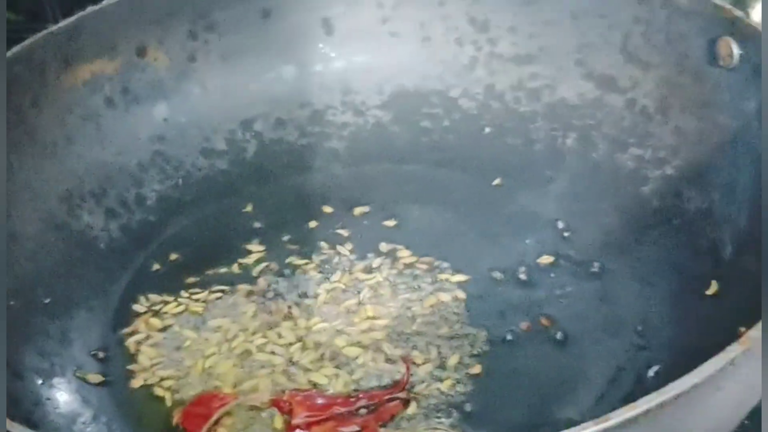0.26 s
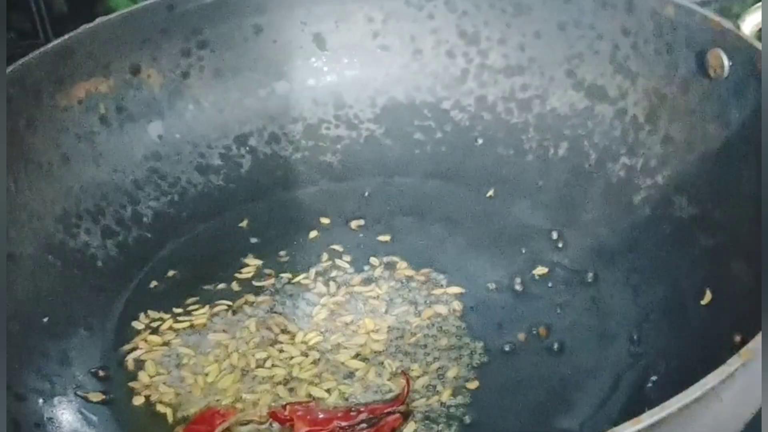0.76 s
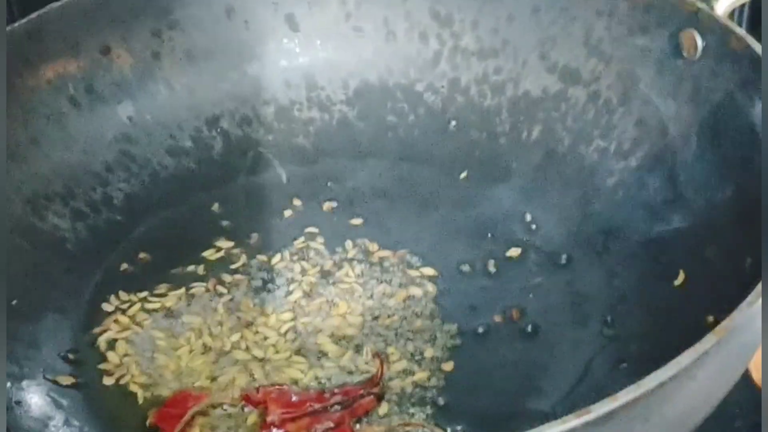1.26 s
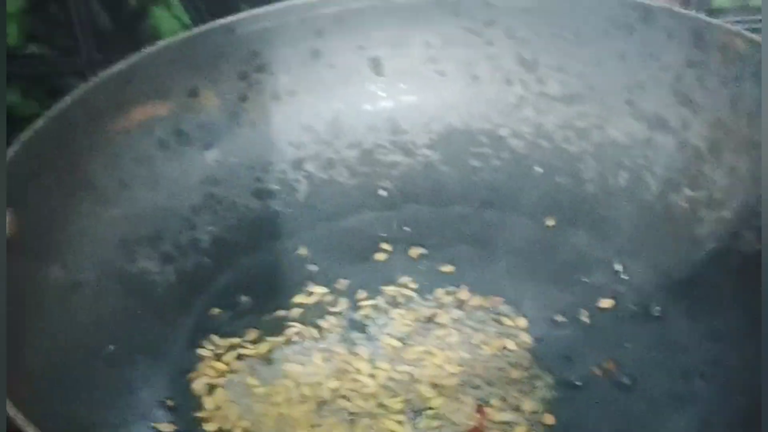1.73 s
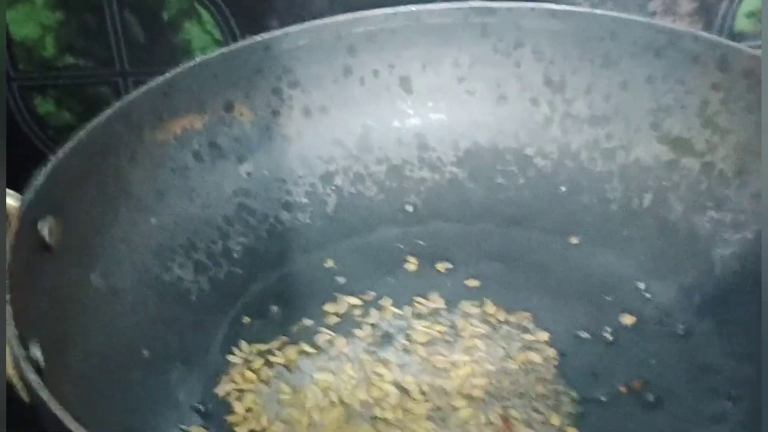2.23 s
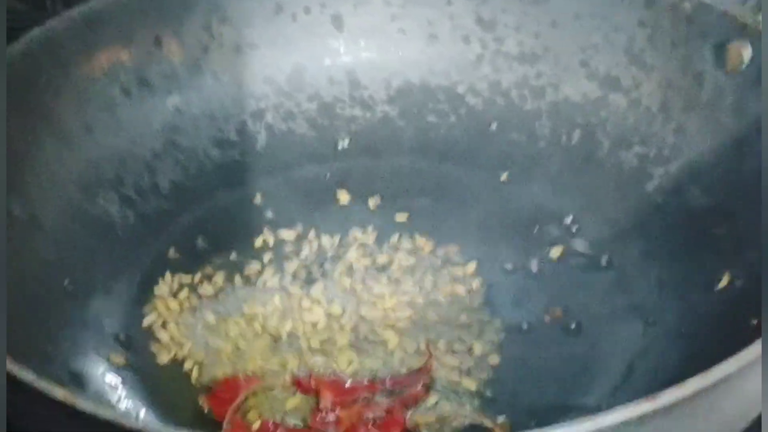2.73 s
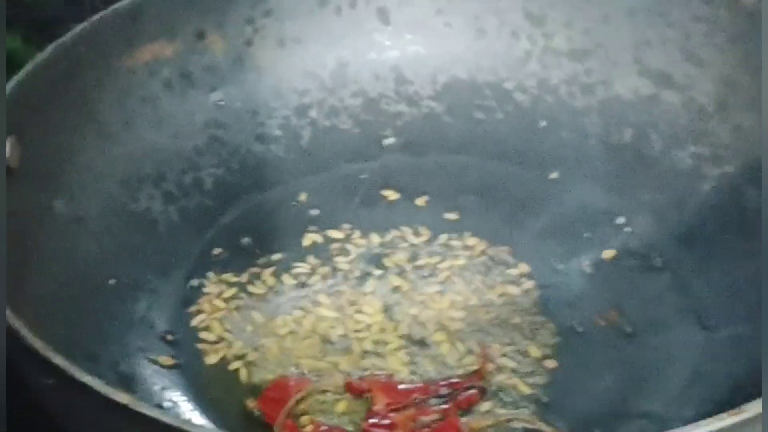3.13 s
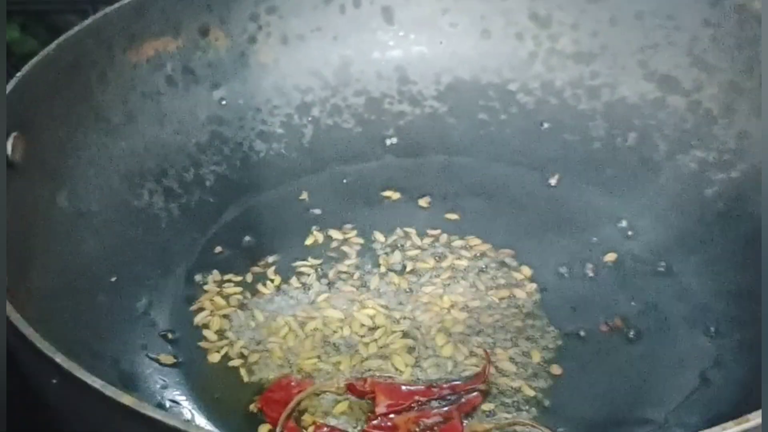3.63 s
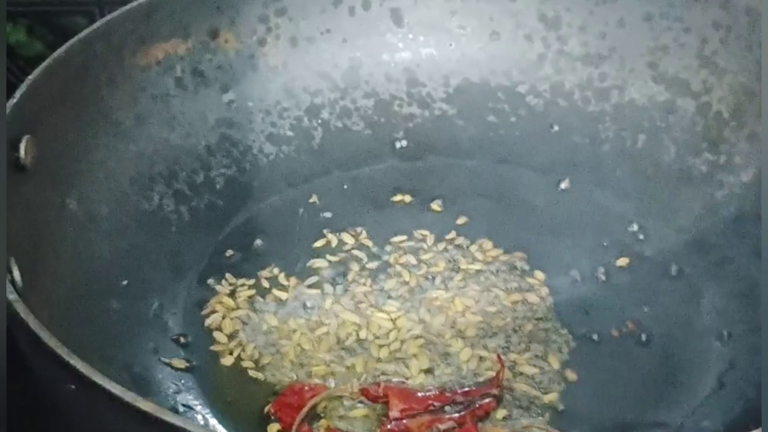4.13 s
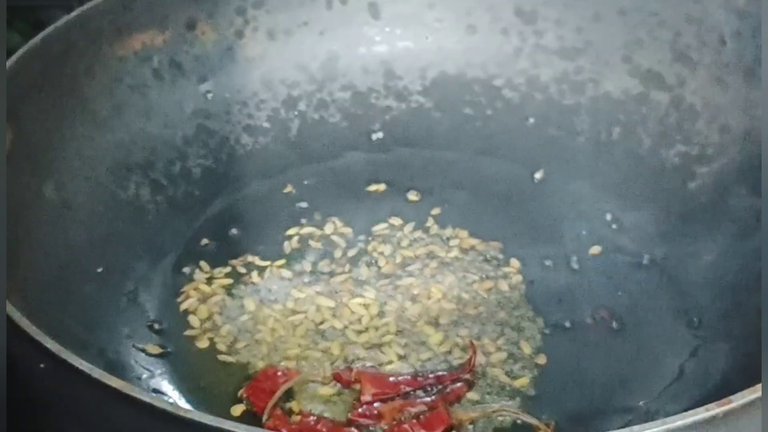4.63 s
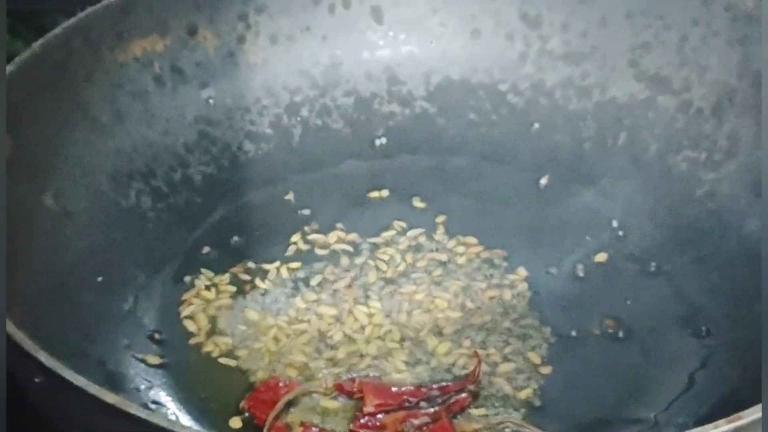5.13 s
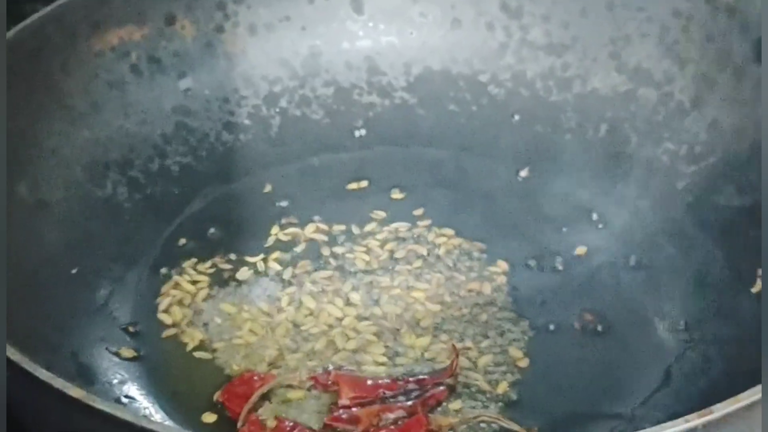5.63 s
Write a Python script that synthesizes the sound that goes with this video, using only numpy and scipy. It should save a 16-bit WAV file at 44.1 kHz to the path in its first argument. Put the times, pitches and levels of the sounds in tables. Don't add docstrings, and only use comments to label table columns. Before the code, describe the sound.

Spice seeds burst in hot oil in an iron pan, close to a hand-held stereo microphone. Irregular bright snaps, duller pops under the oil and tiny ticks each rattle quickly off the metal and die in a small hard kitchen. Behind them are fizzing oil, a low gas flame and a soft fan hum.

```python
import sys
import numpy as np
from scipy import signal
from scipy.fft import rfft, irfft, next_fast_len
from scipy.io import wavfile

SR = 44100
rng = np.random.default_rng(int(sys.argv[2]) if len(sys.argv) > 2 else 0)


def amp(db):
    return 10 ** (np.asarray(db, float) / 20)


def write(x):
    x = np.atleast_2d(x).T
    wavfile.write(sys.argv[1], SR, np.round(np.clip(x, -1, 1) * 32767).astype(np.int16))


N = 259749

# (multiple of shaft rate, level [dB rms])
MOTOR_ORDERS = [(4, -71.5), (8, -72.5), (10, -56), (13, -61), (16, -65.5), (24, -71.5)]
# (frequency [Hz], density [dB per Hz])
FLAME_SPECTRUM = [(20, -50.5), (40, -19.5), (66, -17.5), (85, -11), (110, -21), (150, -11.5), (172, -8.5),
                  (200, 0), (260, -5), (330, -5), (370, -14.5), (440, -14), (520, -18.5), (700, -23.5),
                  (900, -34), (1300, -88.5)]
# (frequency [Hz], density [dB per Hz])
FIZZ_SPECTRUM = [(500, -1), (900, -1.5), (1500, 3), (2200, 1), (4000, -1), (6500, 2), (9000, 5),
                 (12000, 4.5), (14000, -1.5), (16000, 2)]
# (time [s], level [dB])
SEETHING = [(0.0, -52.5), (0.31, -49.5), (0.51, -58), (1.03, -52.5), (1.212, -51), (1.67, -58), (1.9, -51),
            (2.29, -62), (2.56, -53), (2.85, -55), (3.251, -50.5), (3.53, -62), (3.85, -63), (4.05, -56.5),
            (4.64, -55), (4.9, -61), (5.41, -57.5), (5.89, -55.5)]
# (frequency [Hz], left-right likeness)
LIKENESS = [(60, 0.53), (150, 1), (380, 0.93), (950, 0.035), (2380, -0.02), (5980, -0.17), (15000, 0.89)]

# (time [s], peak [dB])
GUSTS = [
    (1.977, -43),
    (2.596, -45),
    (3.108, -39),
]
# (time [s], level [dB])
BOWL_HISS = [(.169, -44), (.451, -48), (.697, -51), (1.04, -43.5), (1.173, -43), (1.364, -51), (1.459, -48),
             (2.357, -43), (2.409, -44), (2.543, -42), (3.042, -47), (3.08, -34), (3.109, -36),
             (3.351, -36.5), (3.433, -36.5), (3.678, -53.5), (4.059, -38.5), (4.287, -51), (4.329, -55),
             (5.053, -47), (5.167, -49), (5.255, -42.5), (5.32, -36)]
# (time [s], level [dB])
SPRAY = [(.697, -42), (.781, -48), (1.173, -40.5), (1.364, -43), (1.385, -48), (1.668, -59), (3.08, -50),
         (3.109, -39.5), (4.07, -40.5), (4.366, -44.5), (5.053, -52), (5.167, -53), (5.203, -55),
         (5.32, -46), (5.486, -51), (5.688, -52), (2.543, -48), (4.581, -44), (3.902, -44), (.245, -42)]
# (time [s], level [dB])
MIST = [(.245, -48), (.414, -52), (.697, -56), (1.767, -52), (1.777, -50), (1.846, -52), (1.978, -48),
        (2.237, -53), (2.471, -47), (2.597, -48), (3.109, -50), (3.902, -64), (3.942, -41), (4.005, -47),
        (4.476, -48), (4.581, -38), (5.202, -58), (5.287, -40), (5.32, -44), (5.415, -46), (5.603, -54),
        (5.814, -50)]
# (time [s], peak [dB], note [Hz], left-right difference [dB])
BLISTERS = [(0.169, -27, 2900, 0), (1.768, -25, 2900, -2), (1.877, -29.5, 2800, -4), (1.98, -28, 2900, 0),
            (1.979, -29, 1600, 5), (2.41, -32, 2960, 0), (2.544, -26, 3200, 0), (3.903, -32, 2850, 0),
            (3.942, -31, 1480, 2), (4.154, -39, 3000, 0), (5.288, -28, 2850, 0), (5.416, -36, 3070, 0),
            (.698, -47, 2930, 0), (5.815, -36, 2900, 0), (5.487, -43, 3100, 0), (.27, -30, 2800, 0),
            (1.666, -36, 1800, 0), (3.08, -30, 1960, 0), (5.208, -40, 6000, 0), (3.942, -40, 1245, 0),
            (1.175, -44, 1200, 0), (5.322, -43, 1250, 0), (1.9, -43, 3550, 0), (1.769, -31, 4170, 0),
            (4.329, -30, 4900, 0), (3.353, -34, 3700, 0), (3.436, -28, 4380, 0), (.452, -29, 5000, 0),
            (2.597, -31, 2200, 0), (5.487, -31, 6800, 0), (5.487, -33, 10600, 4), (2.412, -28, 4300, 0),
            (.248, -21, 6600, -3), (2.357, -34, 4500, 0), (2.551, -28, 2900, 0), (4.005, -28, 11500, 4),
            (1.635, -37, 2850, 0), (3.08, -29, 3500, 0), (4.154, -42, 2300, 0)]

# (time [s], level [dB])
SPARKS = [(0.2444, -26), (.4126, -32), (1.6332, -38), (1.7762, -30), (1.8455, -30), (1.9775, -30),
          (2.091, -36), (2.2364, -38), (2.411, -38), (2.596, -32), (2.8971, -38), (3.9403, -22),
          (4.0045, -25), (4.1162, -40), (4.4745, -30), (4.5802, -26), (4.986, -38), (5.2857, -27),
          (5.4135, -30), (5.813, -34)]
# (time [s], straight level [dB], room level [dB])
CLICKS = [(.2442, -21, -40), (.696, -34, -40), (1.3625, -23, -40), (1.384, -32, -40), (1.4577, -26, -40),
          (1.172, -21, -40), (2.2363, -24, -40), (3.041, -24, -40), (3.078, -22, -34), (4.0573, -22, -40),
          (4.3277, -28, -40), (5.0135, -25, -36), (5.031, -36, -30), (5.4853, -32, -32), (5.7293, -35, -38),
          (5.813, -39, -40), (1.155, -40, -24), (3.4025, -42, -40), (4.082, -29, -36), (5.207, -32, -38),
          (2.5505, -22, -36), (4.341, -36, -36), (1.854, -34, -40), (2.364, -32, -40), (2.481, -34, -40),
          (3.158, -32, -40), (3.18, -32, -40), (3.2, -33, -40), (3.222, -36, -42), (3.234, -37, -42),
          (5.26, -36, -42), (5.3, -26, -38), (5.327, -24, -38), (5.35, -32, -40), (5.378, -34, -40),
          (2.413, -26, -38), (2.606, -32, -40), (1.772, -28, -40)]
# (time [s], peak [dB], cavity [Hz], room share [dB])
PODS = [(0.1695, -15, 2860, -5), (0.4504, -19.5, 4550, 3.5), (0.6958, -17, 4400, 1),
        (1.0395, -40, 3714, -1), (1.1742, -21, 4100, 5), (1.3628, -25.5, 4730, 5), (1.3843, -18.5, 4560, 6),
        (1.4581, -22, 4900, 6), (1.4855, -19.5, 4720, -11), (1.767, -20.5, 3040, 6),
        (1.876, -23, 2970, 3.5), (1.9774, -33, 3100, 4), (2.2368, -16.5, 5440, -1), (2.356, -18.5, 2980, 3),
        (2.4084, -14.5, 2950, -14), (2.4714, -16.5, 3340, -9), (2.5421, -17, 2960, 0),
        (3.041, -23, 4160, 1), (3.0784, -14.5, 3850, 4.5), (3.1078, -6.5, 3100, -13),
        (3.3513, -21.5, 4080, 3), (3.4331, -30, 4090, 0), (3.901, -18, 4580, -2), (4.0584, -34, 3890, 0),
        (4.2867, -28, 4350, 10.5), (4.3281, -26.5, 4670, 9.5), (5.018, -26, 3420, 5),
        (5.1667, -19.5, 4330, 1), (5.2545, -35, 3810, 9), (5.3177, -20.5, 3880, 4)]

# (time [s], peak [dB], thump [dB], knock [dB], crack [dB], snap [dB])
EARLIER_POP = [
    (-.001, -18, -36, -11.5, -12, -7),
]
# (time [s], peak [dB], thump [dB], crack [dB], snap [dB])
CRISP = [(0.2442, -5, -32.5, -12.5, -12.5), (0.2685, -13, -18, -14, -9.5), (0.4125, -14, -22, -15.5, -11),
         (0.4508, -16, -29, -13.5, -18), (1.3631, -17, -24.5, -17, -21), (1.6332, -22, -15.5, -18, -12),
         (1.7762, -20, -23, -24, -3.5), (1.8456, -20.5, -25, -12, -4), (2.0868, -23, -18, -21, -13.5),
         (2.2364, -16, -26.5, -16, -15.5), (2.4704, -13, -29, -18, -20), (2.596, -12.5, -21, -14.5, -15),
         (3.9405, -7, -27.5, -14, -13), (4.004, -19.5, -18, -15, -5), (4.4743, -22, -18, -15, -6.5),
         (4.58, -9.5, -27, -15, -9.5), (5.2007, -25, -19, -10, -10.5), (5.2858, -10, -23, -16.5, -11),
         (5.4138, -14.5, -18, -17.5, -12), (5.4848, -18, -46, -9.5, -13.5), (5.571, -17, -26, -20.5, -19),
         (5.6012, -22.5, -24, -14.5, -7.5), (5.813, -13, -23.5, -14.5, -10)]
# (time [s], peak [dB], thump [dB], knock [dB], top [dB])
MUFFLED = [(0.168, -9.5, -36, -14.5, -28), (.696, -16, -66, -11.5, -18), (0.7796, -14, -34.5, -17.5, -20),
           (1.0387, -19.5, -33.5, -15, -23.5), (1.172, -9.5, -37, -14, -22), (1.4578, -18.5, -27, -15, -22),
           (1.766, -11.5, -30.5, -24, -21.5), (1.9769, -11, -20.5, -13.5, -15),
           (2.3551, -20, -25, -28, -25), (2.4078, -7, -32, -14.5, -23), (2.5422, -5.5, -30, -12.5, -23),
           (3.041, -17.5, -21.5, -17.5, -20), (3.078, -13.5, -34, -8, -24), (3.1077, -7.5, -25, -14, -22),
           (3.351, -16.5, -30, -10, -24.5), (3.433, -10.5, -32.5, -20, -26.5),
           (3.901, -17, -24.5, -12.5, -19), (4.058, -13.5, -28, -12.5, -22), (4.069, -17, -23.5, -15, -17),
           (4.2859, -17.5, -27, -18.5, -23.5), (4.924, -22, -26, -21.5, -31),
           (5.017, -19.5, -24.5, -17, -30), (5.0517, -16, -30.5, -10.5, -22.5),
           (5.1655, -18, -40, -23, -25), (5.319, -4, -29.5, -12, -23.5)]
# (time [s], peak [dB], knock [dB], snap [dB])
TICKS = [(0.765, -23.5, -13, -14.5), (.902, -33, -13, -9.5), (1.134, -27.5, -14, -9.5),
         (1.3423, -31, -20, -6), (1.3834, -30, -9, -9.5), (1.485, -20, -25, -22.5), (1.665, -26, -11, -17),
         (1.8055, -21, -16, -21), (1.875, -37, -21.5, -19.5), (1.942, -35, -18.5, -9.5),
         (2.0317, -24, -15, -11.5), (2.314, -26.5, -10, -19), (2.8971, -30, -10.5, -7),
         (3.59, -44, -25.5, -3), (3.677, -32.5, -12, -36), (4.127, -30.5, -14, -7), (4.152, -29, -3.5, -17),
         (4.3283, -23.5, -35, -17), (4.365, -30.5, -15, -20.5), (4.4342, -23.5, -16, -17.5),
         (4.7617, -33, -11.5, -13.5), (4.9861, -27.5, -19, -11), (5.2554, -32, -8, -16),
         (5.6489, -31, -7.5, -5), (5.687, -23.5, -19, -21), (5.7195, -25, -12, -10), (5.73, -30, -20, -6)]
# (time [s], peak [dB], snap [dB])
MORE_TICKS = [(.164, -30.5, -5.5), (0.2631, -33.5, -17.5), (.507, -29, -12), (0.7118, -23, -16),
              (0.8425, -37.5, -3), (1.5224, -34.5, -9), (2.063, -35, -21), (3.088, -23, -22), (3.471, -26, -18),
              (4.049, -19, -22), (4.116, -32, -14.5), (5.5875, -23.5, -23.5), (5.756, -39.5, -2),
              (5.802, -31, -25.5), (2.539, -14, -13), (3.263, -38, -7), (1.578, -46, -1.5), (2.0912, -31, -3)]
PARTS_HZ = [900, 1500, 2300, 3300, 4600, 5100, 7200, 9000, 11000, 13000]
USUAL_DB = [-27, -17, -15.5, -14.5]

# (lag [s], strength)
PAN_ECHOES = [(.00022, 0.45), (.00048, 0.95), (.0008, .4), (.00115, 0.33)]
# (frequency [Hz], level [dB], t60 [s])
PAN_MODES = [(870, -52.5, 0.3), (1260, -69, 0.76), (1508, -56, 0.58), (1477, -53, 0.25), (1820, -58, 0.31)]
# (frequency [Hz], early t60 [s], late t60 [s], late level [dB], tail level [dB])
TAIL = [(394, 0.16, 0.7, -9.5, -17.5), (1100, 0.091, 0.62, -8, -7), (2300, 0.05, 0.72, -13, -1),
        (3650, 0.062, 0.49, -6.5, -1), (7500, 0.045, 0.53, -12, 5.5), (11190, 0.048, 0.42, -9.5, 3),
        (16000, 0.03, 0.308, -8, 0.5)]
# (frequency [Hz], level [dB])
WALLS = [(1100, 0), (1450, -1), (1720, -6), (1820, 1), (2350, 0), (2600, -3), (3150, 0), (4650, 1),
         (4950, -1.5), (6500, 1.5), (7300, -1)]
# (frequency [Hz], left [dB], right [dB])
STRAIGHT = [(40, -15, -15.5), (326, -7, -27.5), (660.6, 9, 8.5), (1185, 10.5, -41), (1470, 12.5, -5.5),
            (2150, 7.5, 11), (2940, 10, 9), (3980, 8, 4.5), (6240, 10.5, 1.5), (9000, 11, 4),
            (11870, 10.5, 0), (13800, 7, -2), (15900, -6, 7)]
# (frequency [Hz], level [dB])
LEFT_PORT = [(60, 2.5), (200, -1), (1200, 0.5), (2200, 2.5), (4000, 8.5), (5200, 4), (6800, -2), (7400, 1),
             (8400, 8.5), (9800, 4), (11300, 7.5), (13000, 3.5), (15700, 1), (16600, -9)]
# (frequency [Hz], level [dB])
RIGHT_PORT = [(60, -1), (200, -0.5), (1700, 4), (2150, 11), (4300, 8.5), (5200, 5.5), (6600, 10.5),
              (7400, 6), (8000, -33), (8600, -7.5), (9800, -5.5), (11200, -13.5), (15600, 4.5),
              (16600, -28)]
# (frequency [Hz], width [Hz], left [dB], right [dB])
BUMPS = [(194, 9.6, 0.5, -2), (342, 31, 0, 3.5), (365.5, 27, 3, -1), (405.3, 11, 5, 8.5),
         (924, 27.5, -2.5, -9), (1424, 100, 2, -1.5), (1677, 61, -3.5, -1.5), (2520, 89, -0.5, -8),
         (3177, 35, -13, -7.5), (3266, 40, 4.5, -2)]

FLIGHT_S = .001
PLACES = 5


def rms_one(x):
    return x / np.sqrt(np.mean(x ** 2) + 1e-20)


def at_hz(rows, hz):
    f, *columns = np.transpose(rows)
    log_hz = np.log(np.maximum(hz, 1))
    return np.array([np.interp(log_hz, np.log(f), column) for column in columns])


def causal(db):
    cepstrum = irfft(db * np.log(10) / 20)
    half = cepstrum.shape[-1] // 2
    cepstrum[..., 1:half] *= 2
    cepstrum[..., half + 1:] = 0
    return irfft(np.exp(rfft(cepstrum)))


def through(x, response):
    return signal.fftconvolve(x, response, axes=-1)[..., :N]


def filtered(x, order, hz, kind):
    return signal.sosfilt(signal.butter(order, hz, kind, fs=SR, output="sos"), x)


def top_cut(x, hz):
    return signal.sosfilt(signal.ellip(10, .5, 70, hz, fs=SR, output="sos"), x)


def drift(rate, count):
    points = int(rate * N / SR) + 3
    knots = rng.standard_normal((count, points))
    position = np.arange(N) * rate / SR
    return np.array([np.interp(position, np.arange(points), k) for k in knots])


def coloured(white, spectrum):
    size = white.shape[-1]
    hz = np.fft.rfftfreq(size, 1 / SR)
    mid, side = rfft(white)
    alike = np.clip(at_hz(LIKENESS, hz), -1, 1)
    both = np.sqrt(1 + alike) * mid + np.sqrt(1 - alike) * side * [[1], [-1]]
    return rms_one(irfft(both * amp(at_hz(spectrum, hz)), size)[:, :N])


def motor():
    shaft_hz = 18.24
    turn = 2 * np.pi * shaft_hz * np.arange(N) / SR
    wander = 1.1 * drift(4.0, count=len(MOTOR_ORDERS))
    swell = amp(2.8 * drift(7.0, count=len(MOTOR_ORDERS)))
    hum = np.zeros(N)
    for (multiple, db), gain, phase in zip(MOTOR_ORDERS, swell, wander):
        hum += np.sqrt(2) * amp(db) * gain * np.sin(round(multiple) * turn + phase)
    return hum


def flame():
    flicker_db = .8 * drift(9.0, count=1)
    roar = coloured(rng.standard_normal((2, next_fast_len(N))), FLAME_SPECTRUM)
    return amp(-53 + flicker_db) * roar


def oil():
    bubbles_per_s, seethe_hz = 600, 1224
    size = next_fast_len(N)
    bubble_size = np.minimum(rng.exponential(1, size), 3)
    grains = (rng.random(size) < bubbles_per_s / SR) * amp(5.0 * bubble_size)
    crackle = signal.lfilter([1], [1, -.985], grains)
    bed = rng.standard_normal((2, size)) * (1 + 0.095 * crackle)
    hiss = coloured(bed, [(200, -31)] + FIZZ_SPECTRUM)
    low = signal.sosfiltfilt(signal.butter(3, seethe_hz, fs=SR, output="sos"), hiss)
    s, level_db = np.transpose(SEETHING)
    swell_db = np.interp(np.arange(N) / SR, s, level_db) + 65.0
    return amp(-52) * (amp(0.1 * swell_db) * (hiss - low) + amp(swell_db) * low)


def whistle():
    middle_s, length_s, hz, width_hz = 3.83, 0.05, 1500, 200
    b, a = signal.iirpeak(hz, hz / width_hz, fs=SR)
    once = signal.lfilter(b, a, rng.standard_normal(N))
    tone = rms_one(signal.lfilter(b, a, once))
    return amp(-61) * tone * np.exp(-.5 * ((np.arange(N) / SR - middle_s) / length_s) ** 2)


def gusts():
    rise_s, gain_db, right_db, rumble_cut_hz = 0.00059, 7, -22, 43
    t = np.arange(N) / SR
    push = np.zeros(N)
    for s, db in GUSTS:
        u = np.clip((t - s) / rise_s, 0, 50)
        push += amp(db + gain_db) * np.e * u * np.exp(-u)
    return filtered(push, 2, rumble_cut_hz, "high") * amp(np.array([[0], [right_db]]))


def struck_hiss(rows, low_hz, high_hz):
    t60_s, late_t60_s, late_db = 0.083, 0.48, -4.5
    grain_db = 2.5
    s, db = np.transpose(rows)
    t = np.arange(SR // 2) / SR
    blows = np.zeros(N)
    blows[(s * SR).astype(int)] = amp(2 * db)
    decay = amp(-60 * t / t60_s) + amp(late_db - 60 * t / late_t60_s)
    power = through(blows, decay ** 2)
    lumps = np.repeat(rng.standard_normal(N // 60 + 1), 60)[:N]
    grainy = 2 * rng.standard_normal((2, N)) * amp(grain_db * lumps - .4)
    band = signal.cheby1(7, 1, [low_hz, high_hz], "band", fs=SR, output="sos")
    return signal.sosfilt(band, grainy * np.sqrt(np.maximum(power, 0)))


def blisters():
    cycles, rise_s, length = 65, 0.00045, 2048
    t = np.arange(length) / SR
    out = np.zeros((2, N + length))
    for s, db, hz, pan_db in BLISTERS:
        envelope = amp(db - 60 * t * hz / cycles) * (1 - np.exp(-t / rise_s))
        note = np.sin(2 * np.pi * hz * t) * envelope
        sides = amp(np.array([[.5], [-.5]]) * pan_db) * [[1], [.5]]
        at = round(s * SR)
        out[:, at:at + length] += note * sides
    return out[:, :N]


def sparks():
    s, db = np.transpose(SPARKS)
    out = np.zeros(N)
    out[np.round((s + FLIGHT_S) * SR).astype(int)] = amp(db)
    return filtered(out + 1e-18, 3, 11500, "high")


def clicks():
    out = np.zeros((PLACES + 1, N))
    for k, (s, straight_db, room_db) in enumerate(CLICKS):
        at = round((s + FLIGHT_S) * SR)
        out[[0, 1 + k % PLACES], at] = amp(np.array([straight_db, room_db]))
    out = filtered(out + 1e-18, 2, [1900, 7500], "band")
    return out[0], out[1:]


def pods():
    gain_db, width_hz = -11, 560
    t = np.arange(256) / SR
    near, far = np.zeros(N + 512), np.zeros((PLACES, N + 512))
    for k, (s, peak_db, cavity_hz, room_db) in enumerate(PODS):
        decay = np.exp(-np.pi * width_hz * t)
        ring = amp(peak_db + gain_db) * np.sin(2 * np.pi * cavity_hz * t) * decay
        at = round((s + FLIGHT_S) * SR)
        near[at:at + 256] += ring
        far[k % PLACES, at:at + 256] += ring * amp(room_db)
    return near[:N], far[:, :N]


def pan(blows):
    t = np.arange(SR) / SR
    modes = sum(amp(db - 60 * t / t60) * np.sin(2 * np.pi * hz * t) for hz, db, t60 in PAN_MODES)
    return through(blows, modes)


def kitchen():
    start_s = 0.00186
    t = np.arange(SR // 2) / SR
    white = rng.standard_normal((2, PLACES, 2, len(t)))
    lumps = np.repeat(rng.standard_normal((PLACES, 1, len(t) // 30)), 30, axis=2)
    rattle = amp(2.0 * lumps * np.exp(-t / .03))
    out = np.zeros((PLACES, 2, len(t)))
    edges = np.geomspace(200, 18000, 14)
    for k, (low, high) in enumerate(zip(edges, edges[1:])):
        early, late, late_db, tail_db = at_hz(TAIL, np.sqrt(low * high))
        band = filtered(white[k % 2], 2, [low, high], "band")
        out += band * amp(tail_db) * (amp(-60 * t / early) + amp(late_db - 60 * t / late))
    onset = np.clip((t - start_s) / 0.000084 + 1, .1, 1) * (t > .0003)
    return amp(-21) * out * rattle * onset


def all_bursts():
    def small(s, db, thump, knock, snap):
        return s, db, thump, knock, -11 + 0.24 * snap, snap

    crisp = [(s, db, thump, -15.5, crack, snap) for s, db, thump, crack, snap in CRISP]
    muffled = [(s, db, thump, knock, top + 1, top - 1) for s, db, thump, knock, top in MUFFLED]
    ticks = [small(s, db, -21.5, knock, snap) for s, db, knock, snap in TICKS]
    more_ticks = [small(s, db, -22, -18, snap) for s, db, snap in MORE_TICKS]
    return EARLIER_POP + crisp + muffled + ticks + more_ticks


def bursts():
    core_db, air_db = -1.5, -2.5
    shade, straight_shade = 0.065, 0.059
    room_patches = .3
    rows = all_bursts()
    hz = np.fft.rfftfreq(256, 1 / SR)
    lags, strengths = np.transpose(PAN_ECHOES)
    luck = rng.standard_normal((len(rows), 2, len(lags)))
    patches_db = 1.5 * np.repeat(rng.standard_normal((len(rows), 43)), 3, axis=1)
    near = np.zeros(N + 512)
    far = np.zeros((PLACES + 1, N + 512))
    for k, (s, peak_db, *parts_db) in enumerate(rows):
        earlier = k < len(EARLIER_POP)
        thump, knock, crack, snap = np.array(parts_db) - USUAL_DB
        colour = [thump, (thump + knock) / 2, knock, core_db, core_db,
                  crack, crack, snap, snap, snap + air_db]
        smooth_db = peak_db - 2.5 + at_hz(np.transpose([PARTS_HZ, colour]), hz)[0]
        uneven_db = patches_db[k] * (hz > 1500)
        puff, mixed = causal(smooth_db + np.outer([1, room_patches], uneven_db))
        echoes = np.zeros(100)
        delays = np.clip(lags * SR * (1 + .12 * luck[k, 0]), 1, 99).astype(int)
        echoes[delays] = strengths * amp(2.77 * luck[k, 1])
        echoes[0] = 1
        at = round((s + FLIGHT_S) * SR)
        if not earlier:
            near[at:at + 355] += np.convolve(puff, echoes) * amp(straight_shade * min(snap, 0))
        place = -1 if earlier else k % PLACES
        far[place, at:at + 256] += mixed * amp(6.5 - shade * snap)
    return near[:N], far[:, :N]


def seeds():
    right_lag_s, earlier_by_s = .00015, .006
    near, far = bursts()
    pod_near, pod_far = pods()
    click_near, click_far = clicks()
    spark = sparks()
    hz = np.fft.rfftfreq(1024, 1 / SR)
    paths = causal(at_hz(STRAIGHT, hz))
    paths[1] = np.roll(paths[1], round(right_lag_s * SR))
    straight = through((near + pod_near + click_near + spark)[None], paths)
    room = through(kitchen(), causal(at_hz(WALLS, hz))[None])
    into_room = far[:-1] + pod_far + click_far + amp(-3) * spark
    scattered = through(into_room[:, None], room).sum(0) + pan(far.sum(0))
    scattered += through(far[-1:], room[0, :, round(earlier_by_s * SR):])
    return straight, scattered


def scene():
    straight, scattered = seeds()
    background = motor() + flame() + oil() + whistle()
    steam = gusts() + blisters()
    steam += struck_hiss(BOWL_HISS, low_hz=3160, high_hz=4580)
    steam += struck_hiss(SPRAY, low_hz=5280, high_hz=7200)
    steam += struck_hiss(MIST, low_hz=11800, high_hz=15700)
    return top_cut(straight, 16900) + top_cut(scattered + background + steam, 15900)


def band_limit(x):
    return signal.sosfilt(signal.butter(12, 16970, fs=SR, output="sos"), x)


def record(dry):
    hz = np.fft.rfftfreq(8192, 1 / SR)
    colour = np.vstack([at_hz(LEFT_PORT, hz), at_hz(RIGHT_PORT, hz)])
    for centre, width, *sides_db in BUMPS:
        colour += np.outer(sides_db, np.exp(-.5 * ((hz - centre) / width) ** 2))
    mix = np.clip(through(dry, causal(colour)), -1, 1)
    return band_limit(mix)


dry = scene()
out = record(dry)
write(out)
```